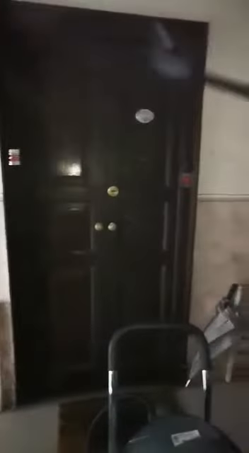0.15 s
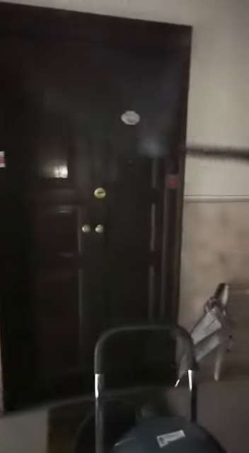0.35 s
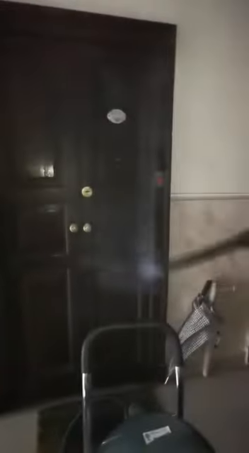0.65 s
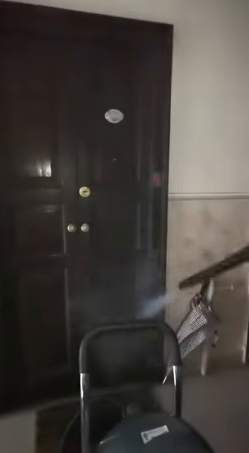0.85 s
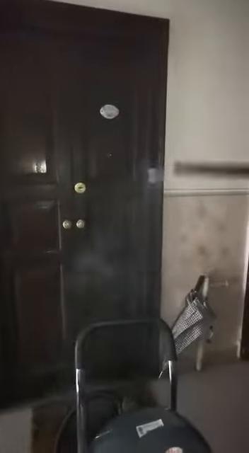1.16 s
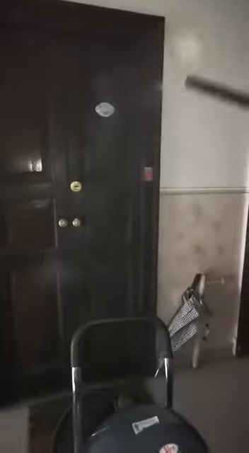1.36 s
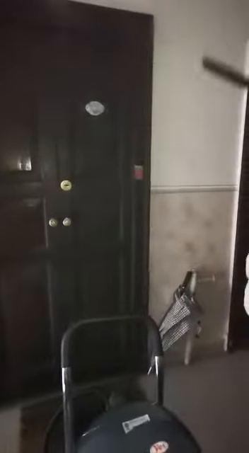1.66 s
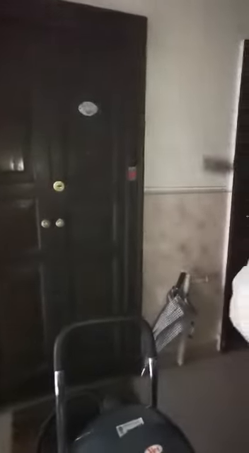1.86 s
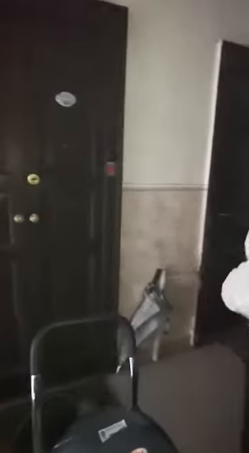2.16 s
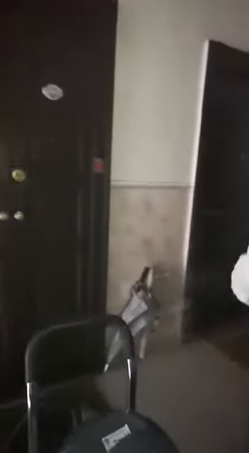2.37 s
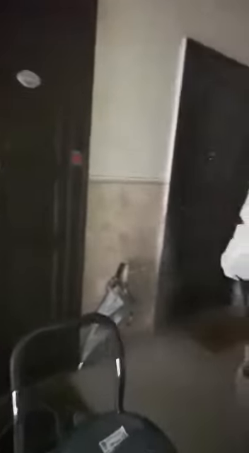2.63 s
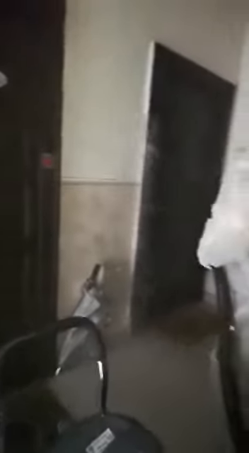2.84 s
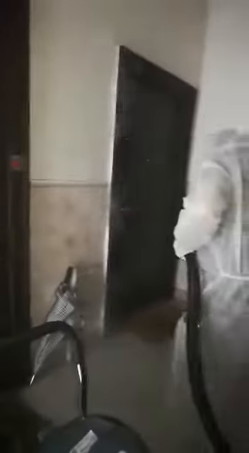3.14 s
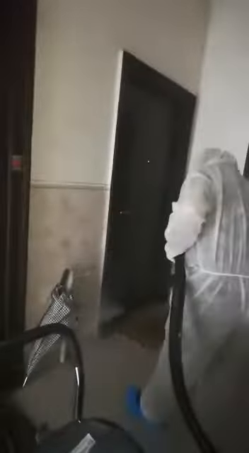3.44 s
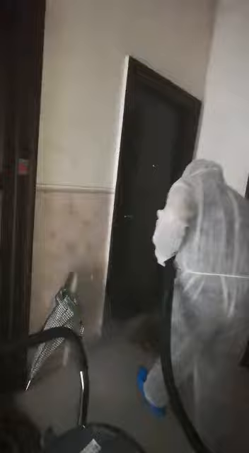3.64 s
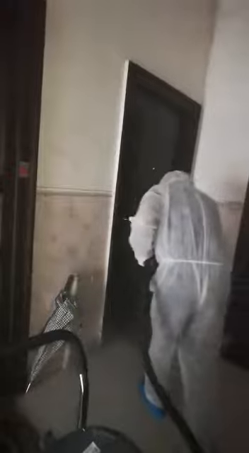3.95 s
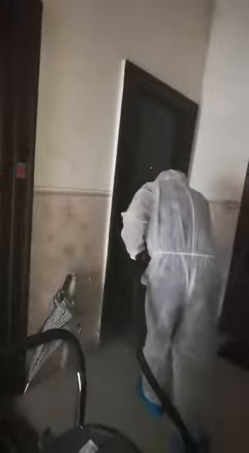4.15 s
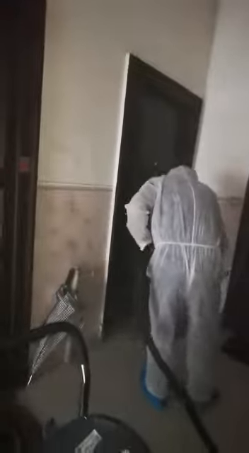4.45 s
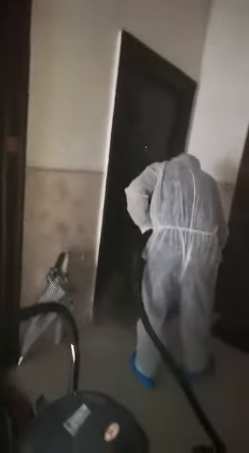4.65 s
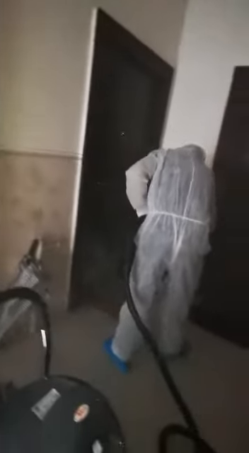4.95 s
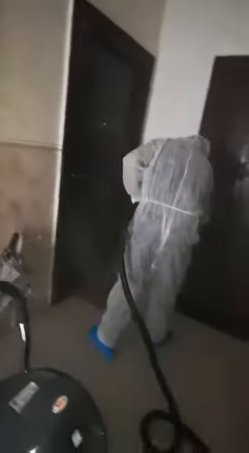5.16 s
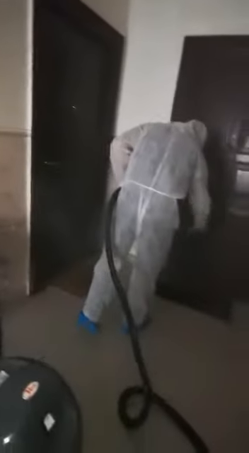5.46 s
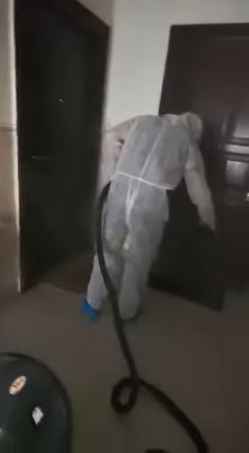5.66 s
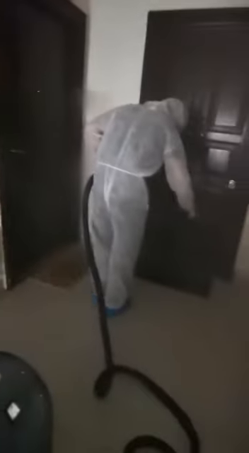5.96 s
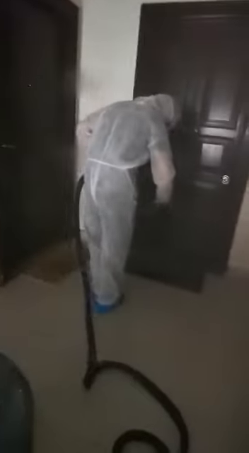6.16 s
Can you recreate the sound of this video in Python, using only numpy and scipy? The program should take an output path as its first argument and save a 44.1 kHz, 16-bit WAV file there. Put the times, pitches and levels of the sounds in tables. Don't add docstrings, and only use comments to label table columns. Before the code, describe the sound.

A steam lance hisses continuously in a tiled stairwell, bright and wide, swelling slightly as it sweeps past doors. Faint hose groans and scuffs lie beneath. The phone's left microphone catches finger rubs, clicks and soft thuds, each briefly dipping the sound. Just after three seconds a pump starts with dry, rapid low knocks, then settles into a fuller resonant buzz under the hiss until the end.

```python
import sys
import numpy as np
from scipy import signal
from scipy.io import wavfile
from scipy.ndimage import uniform_filter1d

SR = 44100
rng = np.random.default_rng(int(sys.argv[2]) if len(sys.argv) > 2 else 0)


def store_pcm(level_fs):
    pcm = np.round(np.clip(level_fs, -1, 1) * 32767).astype(np.int16)
    wavfile.write(sys.argv[1], SR, np.atleast_2d(pcm).T)


def decibels_to_gain(level_db):
    exponent = np.asarray(level_db, float) / 20
    return 10 ** exponent


N = 277815
TIME = np.arange(N) / SR


def level(x, db):
    return x * decibels_to_gain(db) / np.sqrt(np.mean(x ** 2))


def noise():
    return rng.standard_normal(N)


def band(x, lo_hz, hi_hz, order=2):
    return signal.sosfilt(signal.butter(order, [lo_hz, hi_hz], "band", fs=SR, output="sos"), x)


def ring(x, modes):
    out = 0
    for k, (hz, width_hz, db, lag_ms) in enumerate(modes):
        blow = np.roll(x, int(lag_ms * SR / 1000))
        out = out + (-1) ** k * decibels_to_gain(db) * signal.lfilter(*signal.iirpeak(hz, hz / width_hz, fs=SR), blow)
    return out


def patches(shape, tall, wide):
    field = rng.standard_normal(shape)
    for _ in range(2):
        field = uniform_filter1d(field, tall, axis=0)
        field = uniform_filter1d(field, wide, axis=1)
    return field / field.std()


def pull(start_s, lag_s):
    after = np.maximum(TIME - start_s, 0) / lag_s
    return np.e * after * np.exp(-after)


# time_s, loudness_db, turned_away (0-1)
LANCE_SWEEP = [(0.0, 0.5, 0.12), (0.3, -1, 0.16), (0.6, .5, 0.26), (0.88, 2, 0.1), (1.06, -0.5, 0.13),
               (1.25, 2.5, 0.16), (1.5, 1.5, 0), (1.77, 0.5, 0.25), (2.23, 2.5, 0), (2.58, -.5, .3),
               (3.0, 0.5, 0.34), (3.4, 0.5, 0.22), (3.62, -1, .35), (3.91, 2, 0.38), (4.47, -0.5, 0.42),
               (5.0, 1.5, 0.33), (5.9, 0.5, 0.55), (6.3, 0.5, 0.75)]
# start_s, length_s, rustle_db, thud_db, turn_down_db
GRIP_SHIFTS = [(0.124, .1, -64, -53, 0), (0.267, 0.17, -50.5, -65, -2.5), (0.736, 0.097, -49, -60, -3.5),
               (1.03, 0.11, -58, -70, 0), (1.347, 0.12, -58, -64, -4.5), (1.45, 0.17, -52.5, -63, -2),
               (1.84, 0.071, -50, -60, -3.5), (2.124, 0.26, -56, -68, -2.5), (2.656, 0.12, -51, -58, -3.5),
               (2.736, 0.049, -41, -57, -1), (2.803, 0.083, -51.5, -62, 0), (2.99, 0.065, -50.5, -58, -2),
               (3.096, 0.099, -49.5, -58, -2.5), (3.647, .1, -57, -59, -3), (4.505, 0.07, -56, -63, -5.5),
               (5.66, .1, -59, -73, 0.5), (6.172, .1, -63, -79, -2.5)]


def loudness(s):
    turn_down_s, recover_s = 0.026, 0.15
    sweep_s, sweep_db, _ = np.transpose(LANCE_SWEEP)
    start_s, _, _, _, dip_db = np.transpose(GRIP_SHIFTS)
    since = s - start_s[:, None]
    onset = (1 + np.tanh(since / turn_down_s)) / 2
    dips = np.exp(-np.maximum(since, 0) / recover_s) * onset
    return np.interp(s, sweep_s, sweep_db) + dip_db @ dips


def unrest(column, still_db, settle_db_s=-1.1):
    power = decibels_to_gain(2 * (still_db + settle_db_s * TIME))
    for shift in GRIP_SHIFTS:
        start_s, length_s = shift[:2]
        power = power + decibels_to_gain(2 * shift[column]) * np.exp(-(2 * (TIME - start_s) / length_s) ** 2)
    return np.sqrt(power)


def self_noise(left_db=-55.5, right_db=-67, flicker_db=1.5):
    high = band(rng.standard_normal((2, N)), 12400, 15230, order=6)
    flicker = patches((1, N), 1, SR // 20)
    return level(high, 0) * decibels_to_gain(np.array([[left_db], [right_db]]) + flicker_db * flicker)


# start_s, length_s, pitch_hz, width_hz, level_db
SCRAPES = [
    (0.297, .1, 290, 60, -71),
    (0.987, 0.12, 280, 13, -64.5),
    (1.243, 0.29, 300, 250, -63),
    (1.24, 0.35, 800, 200, -66),
    (1.55, 0.097, 272, 29, -66),
    (2.438, 0.1, 300, 55, -68),
    (3.147, 0.18, 260, 260, -61),
]


def hose(hum_hz=285, width_hz=70, hum_db=-76):
    out = level(ring(noise(), [(hum_hz, width_hz, 0, 0)]), hum_db)
    for start_s, length_s, pitch_hz, scrape_width_hz, scrape_db in SCRAPES:
        scrape = level(ring(noise(), [(pitch_hz, scrape_width_hz, 0, 0)]), scrape_db)
        out = out + scrape * np.exp(-(2 * (TIME - start_s) / length_s) ** 4)
    return out


# pitch_hz, width_hz, level_db, lag_ms
FRAME_MODES = [(98, 53, 0.5, 5.6), (139, 34, 5.5, 1.36), (198.4, 23, 1.5, 3.2)]
# pitch_hz, width_hz, level_db, lag_ms
CASE_MODES = [(300, 32, -15, 0.41), (351.5, 14, 0, 0.98), (407.9, 12.5, 6, 2.63), (470, 26, -7.5, 2.34)]


def pump(scatter_db=-1.0, wobble_db=0.3, rattle_db=-12, churn_db=-10, left_db=1.0, right_db=4.0):
    mains_hz, on_s, run_up_s = 49.96, 3.215, 0.05
    loaded_s, loading_s = 3.335, 0.03
    pump_db, grows_db_s = -62, 1
    kick_db = 4.5
    dry_case_db, wet_case_db = -16, 3

    at = np.arange(0, N - 1, SR / mains_hz).astype(int)
    strokes = np.zeros(N)
    strokes[at] = decibels_to_gain(scatter_db * rng.standard_normal(len(at)))
    strokes = level(strokes, 0) + level(noise(), rattle_db)
    frame = level(band(ring(strokes, FRAME_MODES), 84, 440), 0)
    case = level(band(ring(strokes, CASE_MODES), 320, 610), 0)
    churn = level(band(noise(), 74, 360), churn_db)

    running_s = np.maximum(TIME - on_s, 0)
    wet = np.clip((TIME - loaded_s) / loading_s, 0, 1)
    stroke_db = pump_db + grows_db_s * running_s + kick_db * (1 - wet) + loudness(TIME)
    case_db = dry_case_db + (wet_case_db - dry_case_db) * wet
    rocking = decibels_to_gain(wobble_db * patches((1, N), 1, SR // 12)[0])
    sound = ((frame + churn) * rocking + decibels_to_gain(case_db) * case) * decibels_to_gain(stroke_db)
    return sound * np.clip(running_s / run_up_s, 0, 1) * decibels_to_gain([[left_db], [right_db]])


# start_s, peak_db
FINGER_PEELS = [(.2959, -51), (.6975, -43), (1.7965, -49), (1.8212, -48), (1.8335, -47), (1.8485, -48),
                (2.7355, -44), (2.7487, -42), (2.959, -48), (3.121, -51), (4.502, -42)]


def peels(suck_s=0.0022):
    start_s, peak_db = np.transpose(FINGER_PEELS)
    return -decibels_to_gain(peak_db) @ pull(start_s[:, None], suck_s)


# start_s, peak_db
SKIN_SLIPS = [(0.2959, -21.0), (0.6951, -19.5), (0.6969, -15.5), (1.3918, -23.6), (1.7959, -24.2),
              (1.8199, -18.7), (1.821, -23.5), (1.8329, -20.6), (1.8406, -23.2), (1.8463, -18.8),
              (1.8481, -21.8), (2.7122, -21.5), (2.723, -12.7), (2.727, -21.2), (2.7311, -16.2),
              (2.7341, -17.0), (2.7345, -13.4), (2.7351, -13.1), (2.7398, -17.5), (2.7417, -19.2),
              (2.7421, -19), (2.7437, -11.5), (2.7481, -9.0), (2.8126, -23.4), (2.9553, -25),
              (2.9585, -20.5), (3.1042, -23.6), (3.1205, -21.8), (4.5014, -19.5), (4.5166, -23)]


def hand(rate_hz=1800, spread_db=2.6, patchy_db=2.5, leak_db=-30):
    push_samples, recoil_db, recoil_ms = 1.8, -26, 1.3
    still_rustle_db, still_thud_db = -59, -69

    small = (rng.random(N) < rate_hz / SR) * decibels_to_gain(spread_db * np.minimum(rng.exponential(size=N), 4))
    small = small / np.sqrt(np.mean(band(small, 120, 700) ** 2))
    stutter = decibels_to_gain(patchy_db * patches((2, N // 200 + 1), 1, 6).repeat(200, axis=1)[:, :N])
    slips = small * stutter[0] * unrest(2, still_rustle_db) * decibels_to_gain(-16)
    for start_s, peak_db in SKIN_SLIPS:
        slips[int(start_s * SR)] += decibels_to_gain(1.15 * peak_db + 4.5)

    k = np.arange(-600, 601)
    after = np.maximum(k, 0) / (recoil_ms * SR / 1000)
    bump = np.exp(-0.5 * (k / push_samples) ** 2) - decibels_to_gain(recoil_db) * np.e * after * np.exp(-after)
    port = signal.fftconvolve(slips, bump, "same") + peels()
    port = signal.sosfilt(signal.butter(1, 30, "high", fs=SR, output="sos"), port)
    thud = level(band(noise(), 18, 80), 0) * stutter[1] * unrest(3, still_thud_db) * decibels_to_gain(-5)
    return (port + thud) * decibels_to_gain([[0], [leak_db]])


# pitch_hz, left_db (per Hz), right_db (per Hz), likeness (-1..1)
PORT_COLOUR = [(40, -99, -99, 0.94), (386, -92, -89.5, 0.97), (1266, -82.5, -80.5, 0.86),
               (1930, -78, -73, 0.71), (2570, -76, -69.5, 0.18), (3010, -74.5, -75, 0.35),
               (3760, -75, -70.5, 0.26), (4540, -76.5, -71.5, -0.41), (5900, -70.5, -70, -0.058),
               (6340, -73, -72.5, 0.26), (6890, -67.5, -67, -0.03), (7840, -69, -67.5, -0.071),
               (8060, -81, -72.5, 0.3), (10910, -89.5, -91.5, -0.13), (11900, -90.5, -91, -0.038),
               (12800, -94.5, -95, -0.08)]


def jet(surge_db=0.38, comb_db=0.66, flutter_db=0.33, thin_db=1.5):
    away_body_db, away_top_db, mean_away = 6, -1, 0.41
    top_follows, pan_follows = 0.73, -0.21

    hz, s, one = signal.stft(noise(), SR, nperseg=512)
    other = signal.stft(noise(), SR, nperseg=512)[2]
    table_hz, *columns = np.transpose(PORT_COLOUR)
    left_db, right_db, alike = (np.interp(np.log(hz + 1), np.log(table_hz), c)[:, None] for c in columns)
    alike = np.clip(alike, -1, 1)

    sweep_s, _, turned = np.transpose(LANCE_SWEEP)
    away = np.interp(s, sweep_s, turned) - mean_away
    whistle_db = loudness(s)
    pan_db = pan_follows * whistle_db
    body = np.clip((5200 - hz) / 1500, 0, 1)[:, None]
    top = np.clip((hz - 8500) / 1500, 0, 1)[:, None]
    top_db = away_top_db * away + (top_follows - 1) * whistle_db
    swell = whistle_db + body * away_body_db * away + top * top_db
    swell = swell + surge_db * patches(one.shape, 60, 8)
    swell = swell + (comb_db + thin_db * top) * patches(one.shape, 2, 12)

    left = decibels_to_gain(left_db + swell + pan_db / 2 + flutter_db * patches(one.shape, 20, 2))
    right = decibels_to_gain(right_db + swell - pan_db / 2 + flutter_db * patches(one.shape, 20, 2))
    pair = np.array([left * one, right * (alike * one + np.sqrt(1 - alike ** 2) * other)])
    return np.sqrt(SR / 2) * signal.istft(pair, SR, nperseg=512)[1][:, :N]


def stairwell(x, ripple_db=2.0):
    frames = signal.stft(x, SR, nperseg=4096)[2]
    ripple = decibels_to_gain(ripple_db * patches(frames.shape[1:], 2, 4))
    ripple = ripple / np.sqrt(np.mean(ripple ** 2))
    return signal.istft(frames * ripple, SR, nperseg=4096)[1][:, :N]


def scene():
    return hose() + pump() + hand() + stairwell(jet())


def duck(x, knee=0.095, depth_db=-2.5, keen=400, release_s=0.13):
    over = np.maximum(np.abs(x).max(axis=0) - knee, 0)
    held = np.tanh(keen * signal.lfilter([0.01], [1, -np.exp(-1 / (release_s * SR))], over))
    ahead = uniform_filter1d(np.roll(held, -SR // 60), SR // 30)
    return x * decibels_to_gain(depth_db * ahead)


def band_limit(x):
    return signal.sosfilt(signal.butter(12, 15230, fs=SR, output="sos"), x)


def record(dry):
    mix = duck(dry) + self_noise()
    return band_limit(mix)


dry = scene()
out = record(dry)
store_pcm(out)
```